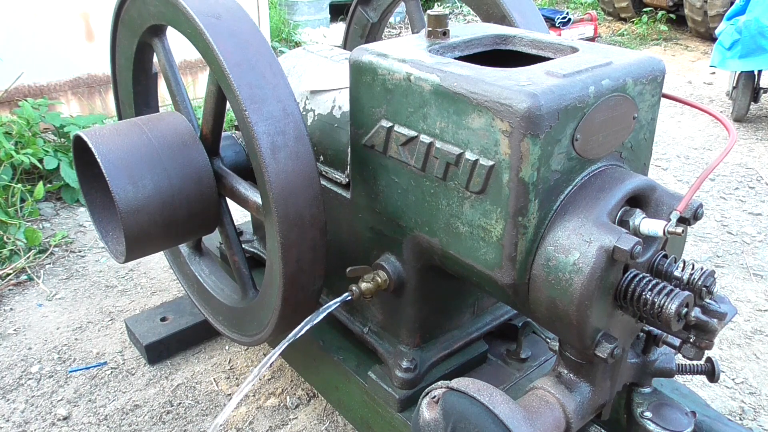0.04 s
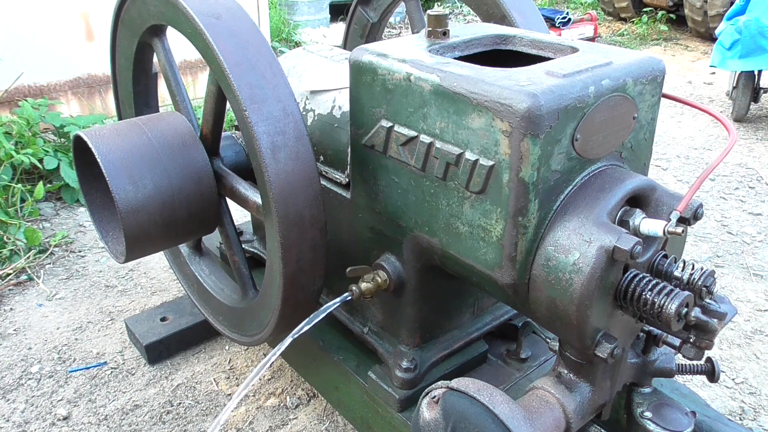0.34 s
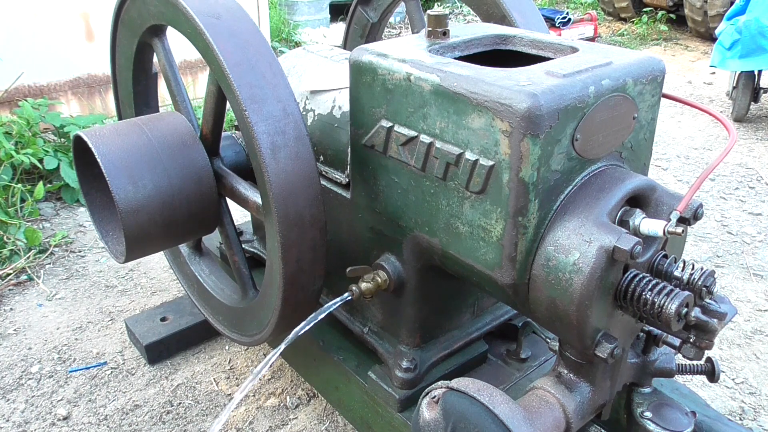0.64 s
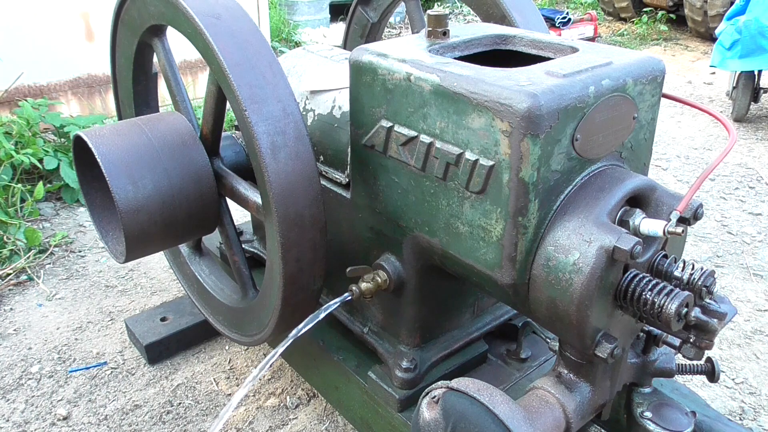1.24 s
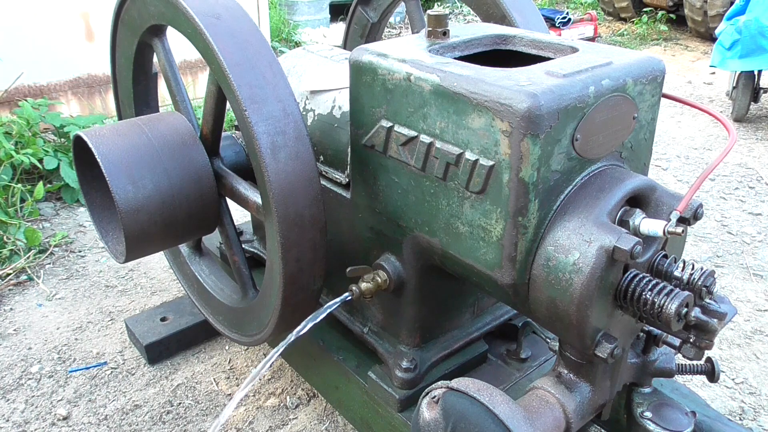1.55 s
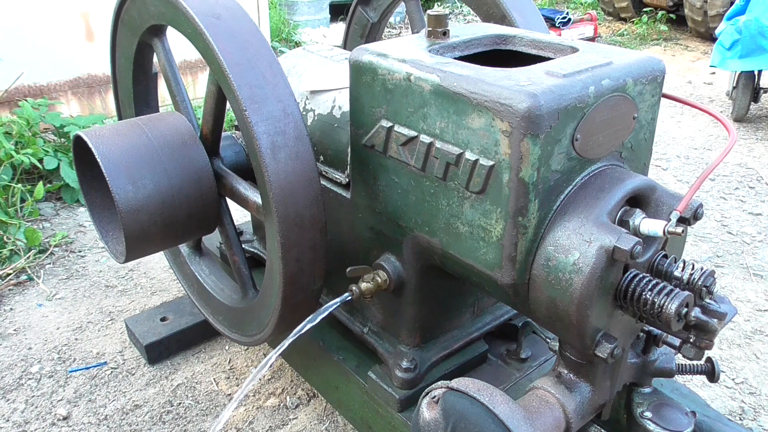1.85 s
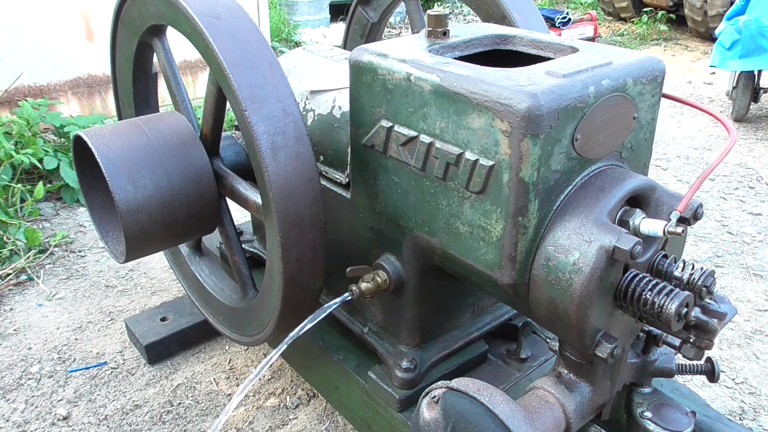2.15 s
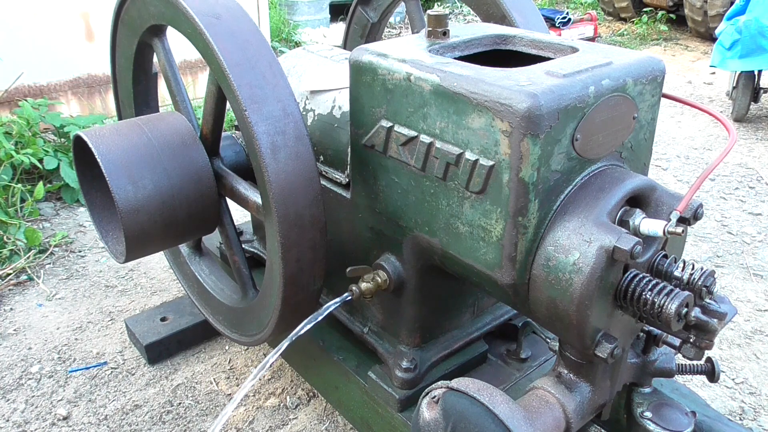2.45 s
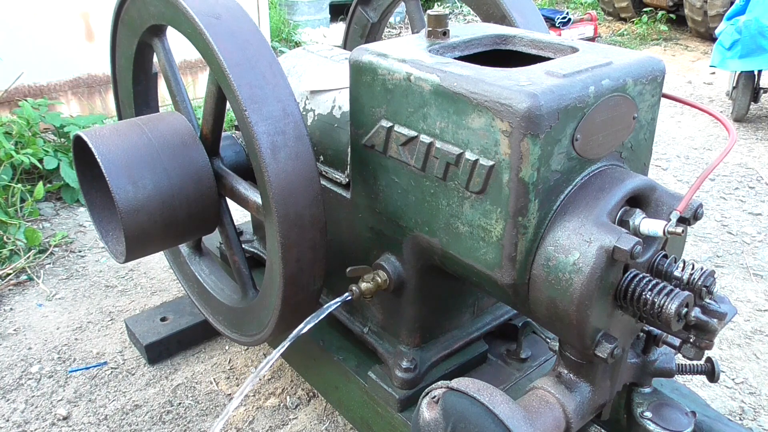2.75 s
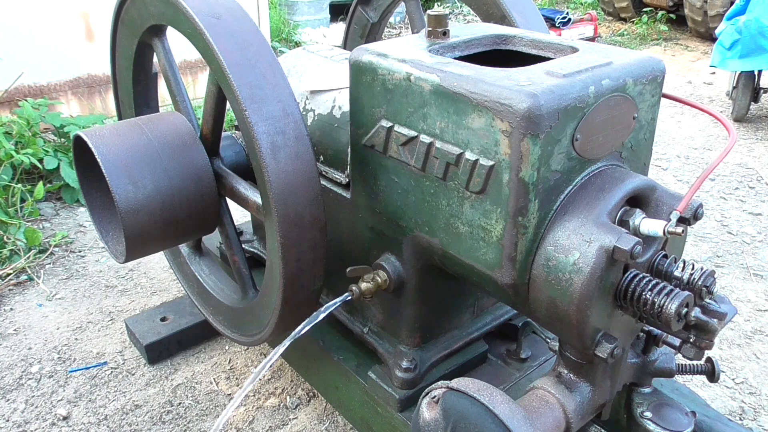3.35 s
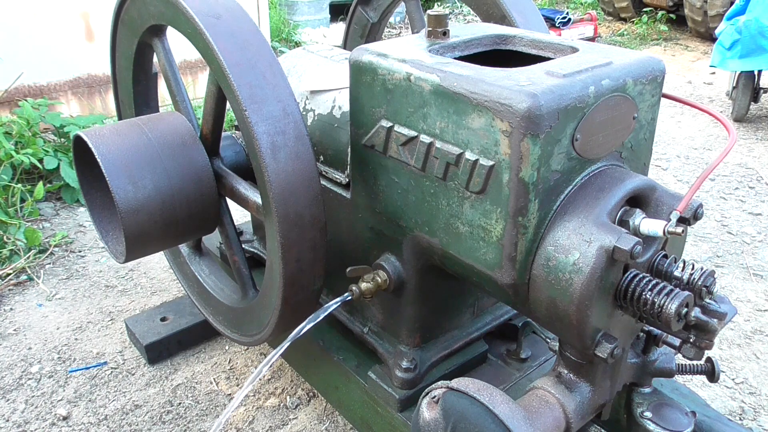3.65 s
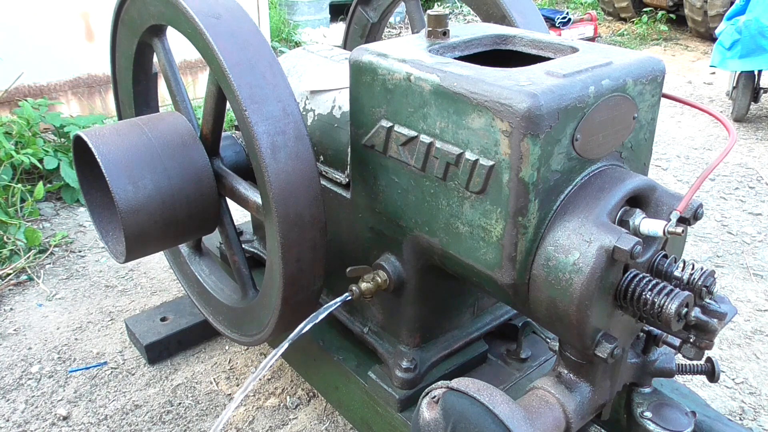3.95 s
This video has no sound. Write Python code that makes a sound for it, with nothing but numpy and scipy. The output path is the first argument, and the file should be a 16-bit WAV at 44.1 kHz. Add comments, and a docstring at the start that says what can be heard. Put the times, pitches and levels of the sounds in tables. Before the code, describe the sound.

Water splatters steadily on sandy ground, heard up close in the open air as a light, high patter dotted with sharp, uneven drips. A soft low rumble sits behind it and rises briefly near the end.

```python
"""Outdoors beside a stopped iron engine, a stereo pair of microphones close to the wet sand.
From the start, a thin stream from the drain tap lands as a fine, fizzing patter over a low rumble.
Larger drops tick throughout, some trapping an air pocket that pops at a lower pitch; each tick
scatters briefly off the ground and the engine. Just after 2 s, froth sizzles faintly behind two
of the drops. Near 3 s the rumble in the background swells once, and the water patters on."""
import sys
import numpy as np
from scipy import signal
from scipy.fft import rfft, irfft
from scipy.io import wavfile

SR = 44100
rng = np.random.default_rng(int(sys.argv[2]) if len(sys.argv) > 2 else 0)


def file_out(sig):
    """Save sig as 16-bit WAV at sys.argv[1]."""
    # one column per channel
    cols = np.atleast_2d(sig).T
    # limit, then scale
    lim = np.clip(cols, -1, 1)
    pcm = np.round(lim * 32767).astype(np.int16)
    wavfile.write(sys.argv[1], SR, pcm)


N = 176400

TICK_TRIM_DB, LOWER_TRIM_DB = 1, 3
SLAP_DB, SLAP_HZ, SLAP_Q = -29.5, 1680, 1.0   # level relative to the drop's strength
# The larger drops, each a tick and a lower resonance; levels before the trims and the splash colour:
# start_s, tick_level_db, tick_pitch_hz, tick_q, lower_level_db, lower_pitch_hz, lower_q
LARGE_DROPS = [(0.0634, -24.5, 10100, 1.4, -36, 3950, 7.4), (0.205, -16, 8840, 5.2, -27.5, 6660, 3.6),
               (0.305, -29, 9700, 2.1, -36.5, 4420, 5.3), (0.3983, -34, 8500, 3, -45, 7000, 4),
               (0.423, -19.5, 7900, 3.3, -31.5, 5300, 5.3), (0.4276, -27, 9900, 6, -47, 7500, 4),
               (0.447, -8.5, 10400, 3, -21, 7660, 3.7), (0.5821, -25, 7800, 6.2, -59, 3600, 4),
               (0.597, -20, 12100, 2.1, -45, 7050, 4), (0.6106, -28.5, 8200, 0.92, -48, 2510, 1.5),
               (0.6485, -27.5, 9000, 7.1, -42, 7500, 4.3), (0.6756, -32, 11000, 5, -51, 7500, 4),
               (0.7138, -23, 9000, 5, -35, 7460, 4.4), (0.76, -30, 8800, 1.5, -33, 7100, 4.6),
               (0.787, -19, 10200, 2.8, -25.5, 4900, 4), (0.8348, -26.5, 9100, 3.2, -33, 7450, 4.3),
               (0.8657, -17, 9900, 1.3, -30, 7400, 4), (0.9311, -29, 10100, 10, -53, 7500, 4),
               (0.9595, -19.5, 9200, 4.3, -44, 3750, 2.3), (1.0084, -31, 9900, 4.7, -34, 7400, 4.5),
               (1.0209, -25.5, 8550, 3.7, -37, 7400, 4), (1.0394, -28, 8400, 5.3, -42, 7000, 4),
               (1.1227, -25.5, 7150, 2.3, -36, 6160, 4.9), (1.155, -21.5, 9800, 9.3, -53, 3060, 2),
               (1.1892, -27, 8850, 8.7, -41, 7500, 4), (1.3156, -26, 10300, 4.4, -53, 7500, 4),
               (1.3286, -18.5, 6450, 2.3, -29.5, 5870, 4), (1.4573, -32.5, 9300, 2.1, -41.5, 4670, 4),
               (1.5214, -21.5, 9300, 1.2, -42, 6450, 4), (1.5438, -22, 8400, 3.9, -36, 7400, 4),
               (1.565, -26, 11000, 5.6, -37, 7500, 4), (1.589, -29, 8200, 4.4, -44, 7000, 4),
               (1.599, -28, 9600, 4, -48, 7500, 4), (1.6146, -13.5, 7600, 2.5, -27.5, 6300, 4),
               (1.661, -21, 7300, 0.93, -29.5, 6500, 4.6), (1.705, -30, 9850, 4, -48, 7500, 4),
               (1.813, -17.5, 11800, 2, -37, 7650, 5), (1.8224, -27.5, 8600, 4, -44, 7000, 4),
               (1.9387, -33, 10500, 8.6, -29.5, 7460, 4.4), (1.972, -24, 10000, 3.8, -39, 7500, 4),
               (1.9861, -25.5, 10500, 7.8, -48, 7500, 4), (2.0895, -28, 9700, 7.4, -35, 6700, 4),
               (2.1348, -23.5, 10000, 4.4, -49, 5050, 4), (2.1465, -15.5, 8800, 5.4, -24, 4430, 4.3),
               (2.3981, -17, 9100, 2.7, -28, 4650, 5.4), (2.4259, -26.5, 10400, 8.7, -47, 4550, 4),
               (2.4778, -26.5, 8050, 4.6, -46, 6500, 4), (2.5542, -22, 11600, 6.8, -46.5, 2980, 1.5),
               (2.6304, -14.5, 8540, 1.5, -63, 4140, 4), (2.6557, -27, 10000, 4, -54, 2400, 2.2),
               (2.6851, -22, 10000, 5.1, -55, 4000, 4), (2.7767, -26.5, 8600, 4, -41, 7000, 4),
               (2.787, -24, 10040, 8.6, -44, 7500, 4), (2.851, -21, 7500, 0.75, -27, 3580, 4.7),
               (2.8531, -30, 7500, 3, -37, 4000, 18), (2.8905, -35, 8900, 4, -48, 7000, 4),
               (2.9206, -16, 7100, 2.4, -29, 5900, 4.5), (2.9634, -25, 10500, 6.5, -31.5, 7200, 3.7),
               (2.9894, -21, 7400, 1, -31, 6250, 4), (3.059, -27.5, 8900, 4.2, -55, 4170, 4),
               (3.1156, -27.5, 9300, 5.2, -41, 7050, 4), (3.214, -26, 9050, 2.6, -46, 7500, 4),
               (3.2753, -27, 7650, 3.2, -39, 5940, 4), (3.3318, -15, 5900, 1.7, -35, 4900, 4),
               (3.3429, -19, 8600, 4.5, -24.5, 4250, 5.9), (3.3572, -18, 8850, 8.0, -43, 3050, 2.8),
               (3.4018, -24, 7450, 4.3, -46, 6000, 4), (3.4056, -17, 8550, 2.3, -28, 6500, 4),
               (3.4513, -26, 8650, 4, -38, 7000, 4), (3.4545, -32, 10300, 5.9, -34.5, 7100, 6.6),
               (3.4602, -25, 9200, 4, -45, 7500, 4), (3.4959, -33, 5500, 0.92, -17.5, 2810, 2.4),
               (3.497, -11.5, 6760, 1.1, -34, 3080, 3.6), (3.5037, -29, 8150, 2, -37, 4240, 3.2),
               (3.6118, -24, 8950, 3.1, -51, 7000, 4), (3.7375, -34, 8000, 2, -49.5, 4300, 3.4),
               (3.7444, -18.5, 8960, 7.1, -30, 7840, 6.2), (3.8745, -21.5, 9400, 8.6, -32, 7500, 4.4),
               (3.8969, -27, 8800, 4, -39, 7000, 5.8), (3.928, -24.5, 10000, 5.2, -34, 7700, 4.4)]
def large_drops():
    """Each large drop is a sharp tick with a lower resonance, on some a distinct pop, and a dull slap."""
    out = np.zeros((2, N))
    for start_s, tick_db, tick_hz, tick_q, lower_db, lower_hz, lower_q in LARGE_DROPS:
        tick, lower = from_db(tick_db + TICK_TRIM_DB), from_db(lower_db + LOWER_TRIM_DB)
        slap = from_db(SLAP_DB) * np.hypot(tick / max(tick_q, 1), 2 * lower)
        hit = tick * ping(tick_hz, tick_q) - lower * ping(lower_hz, lower_q)
        hit += slap * ping(SLAP_HZ, SLAP_Q)
        add(out, start_s, to_microphones(hit))
    return out


DROPLETS_PER_S, GAP_SCATTER = 330, 0.5
DROPLET_DB, SIZE_SPREAD_DB, SIZE_CAP_DB = -39.5, 8, 7.5
DROPLET_HZ, PITCH_SPREAD_OCT, DROPLET_Q, LOW_CUT_HZ = 9300, 0.25, 4.4, 5300
def patter(spots=40, per_spot=400):
    """Droplets of random size land on many spots, each spot with its own pitch and loose rhythm."""
    out = np.zeros((2, N))
    quantiles = (np.arange(spots) + .5) / spots
    octaves = PITCH_SPREAD_OCT * rms_one(np.log(quantiles / (1 - quantiles)))   # bell-shaped spread
    low_cut = signal.butter(2, LOW_CUT_HZ, "high", fs=SR, output="sos")
    for pitch_hz in DROPLET_HZ * 2 ** octaves:
        splash = signal.sosfilt(low_cut, to_microphones(ping(pitch_hz, DROPLET_Q)))
        gaps = 1 + GAP_SCATTER * rng.uniform(-1, 1, per_spot)
        times = (np.cumsum(gaps) - 2 - rng.random()) * spots / DROPLETS_PER_S
        times = times[(times > 0) & (times < N / SR)]
        size_db = np.minimum(SIZE_SPREAD_DB * rng.standard_normal(per_spot), SIZE_CAP_DB)
        for start_s, gain in zip(times, from_db(DROPLET_DB + size_db)):
            add(out, start_s, gain * splash)
    return out


def ping(pitch_hz, q, size=256):
    """One impact rings for a few cycles as a damped resonance; peak 1."""
    ring = signal.unit_impulse(size)
    for stage_q in (1, max(q, 1)):   # the broad first stage steepens the skirts
        ring = signal.lfilter(*signal.iirpeak(min(pitch_hz, SR / 3), stage_q, SR), ring)
    return ring / np.abs(ring).max()


LEFT_LEAD_S, ECHO_DB, ECHO_S = 0.000015, -16, 0.000819
NEAR_DB, NEAR_T60_S, NEAR_DELAY_S = -6, 0.016, 0.00043
YARD_DB, YARD_T60_S = -20.5, 0.088
def to_microphones(hit, size=4096):
    """A hit reaches the pair directly, then by one reflection, near scatter and a faint yard tail."""
    t = np.arange(size) / SR
    lead_samples = LEFT_LEAD_S * SR * rng.uniform(0.94, 1.4)   # varies with the landing spot
    since_arrival = np.arange(size) - 4 - np.array([[0], [lead_samples]])
    direct = np.sinc(since_arrival)
    echo = -from_db(ECHO_DB) * np.sinc(since_arrival - ECHO_S * SR)
    near = from_db(-60 * t / NEAR_T60_S) * np.clip(t / NEAR_DELAY_S - 1, 0, 1)
    yard = from_db(-60 * t / YARD_T60_S) * np.clip(t / NEAR_T60_S, 0, 1)
    decay = np.hypot(from_db(NEAR_DB) * rms_one(near), from_db(YARD_DB) * rms_one(yard)) / np.sqrt(size)
    shared, per_side = rng.standard_normal(size), rng.standard_normal((2, size))
    scatter = decay * (shared + per_side) / np.sqrt(2)
    return signal.fftconvolve(hit[None], direct + echo + scatter, axes=1)


# Colour of all the splashes at the microphones: frequency_hz, gain_db
SPLASH_COLOUR = [(500, 18.5), (1250, 2), (1750, -8.5), (2100, -5), (2550, 1.5), (3050, -3.5), (3500, -0.5),
                 (4400, 0.5), (6200, -4.5), (7300, -0.5), (9500, -0.5), (12000, 2), (13000, -2.5),
                 (15500, 3.5)]
def splashes(left_db=0.55):
    """Drops and patter share one colour and sit just left of centre."""
    colour = from_db(per_bin(SPLASH_COLOUR))
    water = large_drops() + patter()
    return irfft(rfft(water) * colour, N) * from_db([[left_db], [0]])


# Spectrum of the fine spray: frequency_hz, relative_level_db
SPRAY_SPECTRUM = [(1500, -24), (2600, -15), (3400, -13.5), (4300, -8.5), (6100, -16), (7900, 1.5),
                  (10200, -0.5), (12000, -5), (13000, -3.5), (15500, -15)]
def spray(level_db=-55, flutter_db=4, flutter_hz=61.36):
    """The finest spray merges into a hiss whose level flutters at random."""
    flutter_steps = np.arange(N) / SR * 2 * flutter_hz   # two random values a cycle
    flutter = np.interp(flutter_steps, np.arange(N), rng.standard_normal(N))
    return from_db(level_db + flutter_db * flutter) * stereo_noise(SPRAY_SPECTRUM)


# Froth on the sand after two of the drops: start_s, length_s, pitch_hz, level_db
FROTH_WISPS = [(2.147, 0.19, 4400, -65), (2.397, 0.16, 4740, -61.5)]
def froth(q=4):
    """Froth sizzles in soft, narrow-band wisps that fade in and out."""
    out = np.zeros((2, N))
    for start_s, length_s, pitch_hz, level_db in FROTH_WISPS:
        wisp = rng.standard_normal((2, SR // 4))
        for _ in range(2):
            wisp = signal.lfilter(*signal.iirpeak(pitch_hz, q, SR), wisp)
        wisp = rms_one(wisp)[:, :int(length_s * SR)]
        add(out, start_s, from_db(level_db) * wisp * np.hanning(wisp.shape[1]))
    return out


AIR_DB, SWELL_DB = -55, -49
SWELL_START_S, SWELL_RISE_S, SWELL_HOLD_S, SWELL_FALL_S = 2.825, 0.12, 0.071, 0.41
# Spectra of the open air and of its swell: frequency_hz, relative_level_db
AIR_SPECTRUM = [(20, -27), (33, -23), (48, -6), (62, -7.5), (90, -4.5), (150, 0.5), (195, -3), (265, -2.5),
                (420, -10), (750, -14.5), (1230, -16.5), (1650, -27), (3000, -33.5), (8000, -45)]
SWELL_SPECTRUM = [(20, -13), (48, -3), (70, -0.5), (110, 3), (190, 0.5), (330, -10), (600, -16.5),
                  (1500, -30), (5000, -70)]
def outdoor_rumble():
    """A steady low rumble lies behind the water and swells softly once."""
    corners_s = np.cumsum([SWELL_START_S, SWELL_RISE_S, SWELL_HOLD_S, SWELL_FALL_S])
    swell = np.interp(np.arange(N) / SR, corners_s, [0, 1, 1, 0])
    air = from_db(AIR_DB) * stereo_noise(AIR_SPECTRUM)
    return air + from_db(SWELL_DB) * swell * stereo_noise(SWELL_SPECTRUM)


# Likeness of spray and rumble at the two microphones: frequency_hz, correlation (0 to 1)
PAIR_CORRELATION = [(60, 0.93), (150, 0.94), (350, 0.58), (700, 0.3), (1300, 0.27), (3000, 1), (9000, 0),
                    (15000, 0)]
def stereo_noise(spectrum):
    """Coloured noise across the pair, most alike in the bass and near 3 kHz; rms 1."""
    mid, side = rfft(rng.standard_normal((2, N))) * from_db(per_bin(spectrum))
    alike = per_bin(PAIR_CORRELATION)
    left_right = np.sqrt(1 + alike) * mid + np.sqrt(1 - alike) * side * [[1], [-1]]
    return rms_one(irfft(left_right, N))


def from_db(db):
    """Decibels to gain."""
    return 10 ** (np.asarray(db) / 20)


def rms_one(x):
    """Scale to rms 1."""
    return x / np.sqrt(np.mean(x ** 2) + 1e-20)


def per_bin(table):
    """Read a table at every FFT bin, along a log-frequency axis."""
    table_hz, values = np.transpose(table)
    bin_hz = np.arange(N // 2 + 1) * SR / N
    return np.interp(np.log(bin_hz + 1), np.log(table_hz), values)


def add(out, start_s, sound):
    """Mix a stereo sound in at start_s."""
    i = int(np.clip(start_s * SR, 0, N - 1))
    out[:, i:i + sound.shape[1]] += sound[:, :N - i]


def scene():
    """Water on the sand close in front, the outdoor rumble behind."""
    return splashes() + spray() + outdoor_rumble() + froth()


def record(dry, cutoff_hz=16000):
    """The microphone signal is cut steeply at the top."""
    return signal.sosfilt(signal.ellip(10, .2, 80, cutoff_hz, fs=SR, output="sos"), dry)


dry = scene()
out = record(dry)
file_out(out)
```